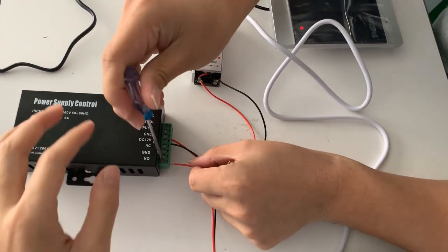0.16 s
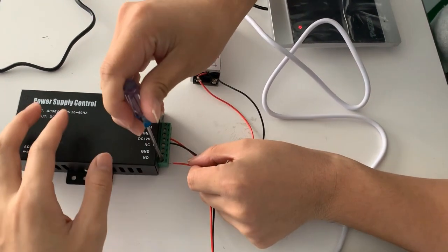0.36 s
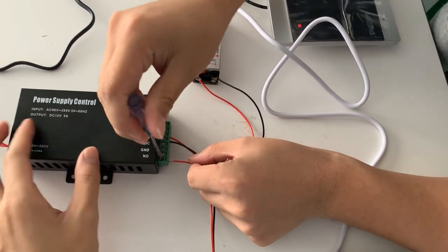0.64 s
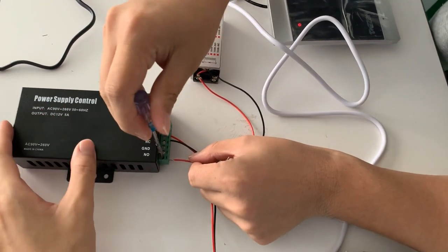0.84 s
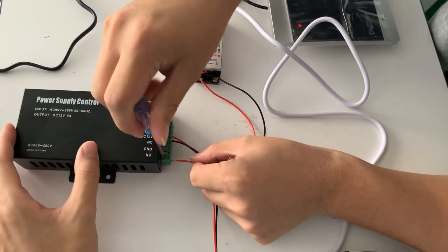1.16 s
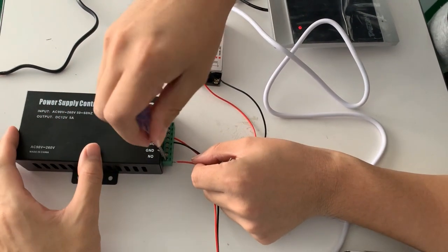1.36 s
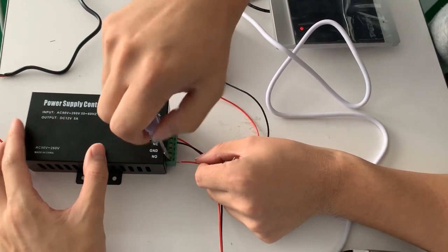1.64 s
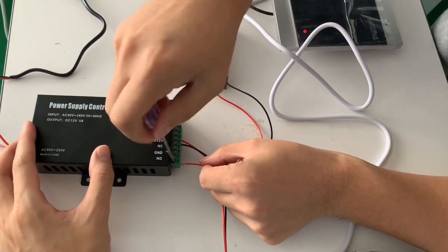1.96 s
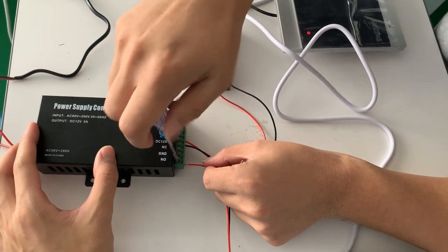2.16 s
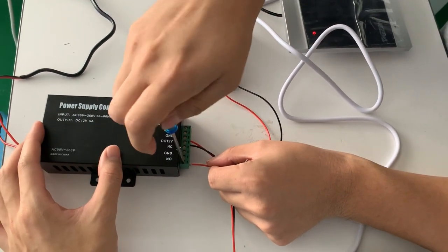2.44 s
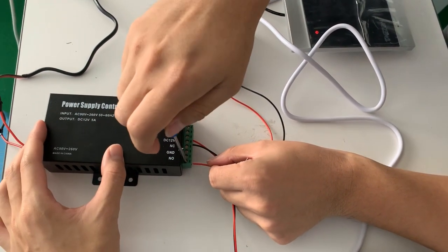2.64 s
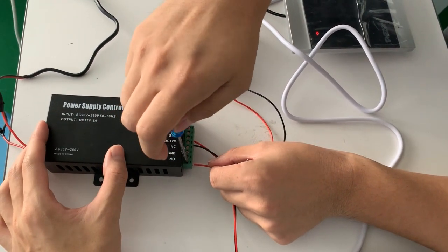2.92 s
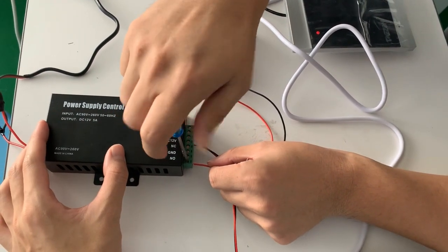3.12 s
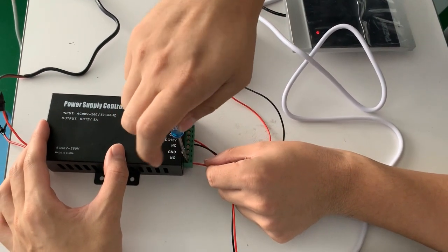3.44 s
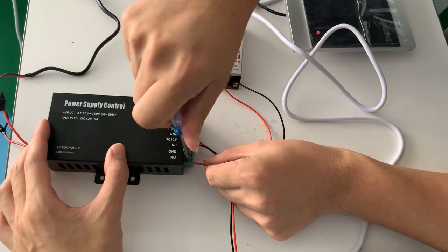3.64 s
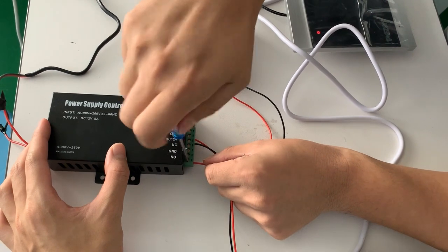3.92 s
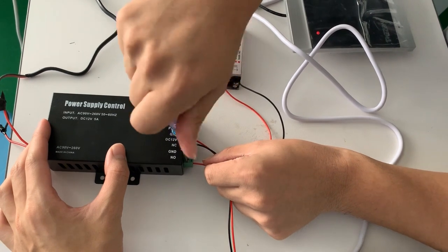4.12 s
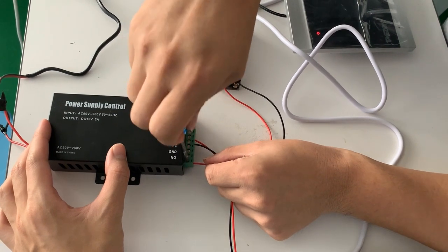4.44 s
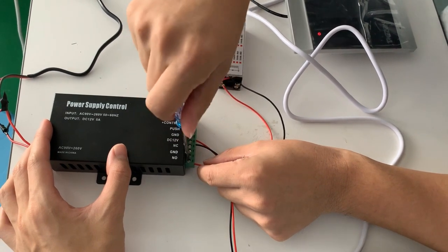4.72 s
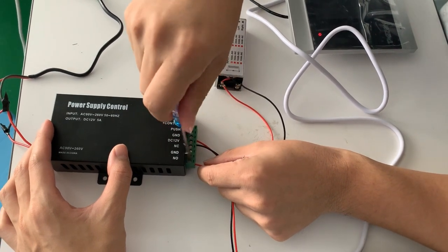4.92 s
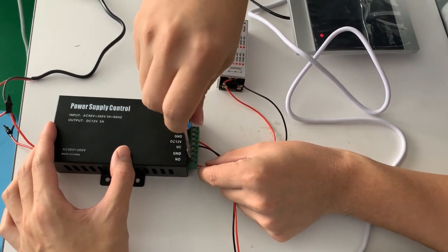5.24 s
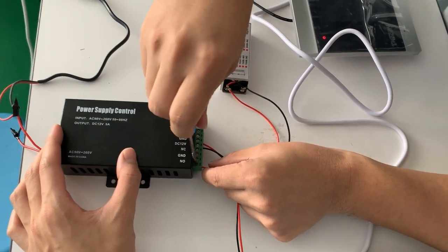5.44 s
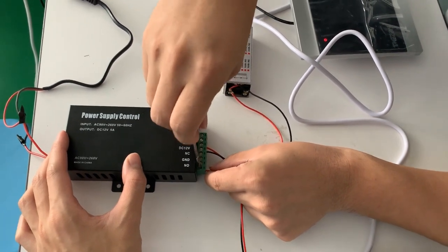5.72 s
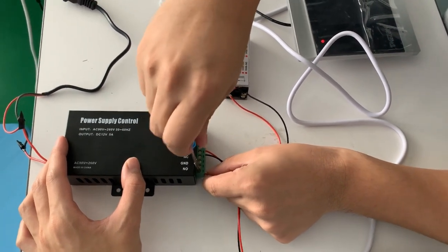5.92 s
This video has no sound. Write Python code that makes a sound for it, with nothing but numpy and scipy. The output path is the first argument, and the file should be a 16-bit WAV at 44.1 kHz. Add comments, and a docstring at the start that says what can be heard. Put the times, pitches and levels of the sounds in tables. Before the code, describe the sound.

Close, irregular clicks and light knocks of a small tool on a metal box, faint rustling, and a distant air puff over deep workroom hum.

```python
"""Throughout, machines hum in the air noise of a large workroom, and skin and wire rustle as grainy noise.
From the start a small screwdriver and wire ends tick on a plastic terminal block: short pushes ring steel modes.
The metal box under it knocks and the desk thuds, in lower modes; early on the blade squeals once, and it drags.
Far squeaks, thin wandering tones, follow, then one puff of an air valve, a shaped hiss; ticks go on to the end.
A phone with two ports above the desk hears bass in the middle and combs the treble between middle and sides."""
import sys
import numpy as np
from scipy import signal
from scipy.fft import rfft, irfft, next_fast_len
from scipy.io import wavfile
from scipy.ndimage import uniform_filter1d

SR = 44100
rng = np.random.default_rng(int(sys.argv[2]) if len(sys.argv) > 2 else 0)


def ratio(d):
    """dB to gain"""
    e = np.asarray(d, float) / 20
    return 10 ** e


def file_out(sig):
    """Save sig as 16-bit WAV at sys.argv[1]."""
    # one column per channel
    cols = np.atleast_2d(sig).T
    # limit, then scale
    lim = np.clip(cols, -1, 1)
    pcm = np.round(lim * 32767).astype(np.int16)
    wavfile.write(sys.argv[1], SR, pcm)


N = 267775
TIME = np.arange(N) / SR

# Modes of the metal box. Each row: frequency in Hz, relative level in dB, undamped time to fall 60 dB in seconds.
BOX_MODES = [(950, 1, 0.05), (1065, 3, 0.062), (1330, -10.5, 0.027), (1378, 2, 0.036), (1480, -1.5, 0.037),
             (1600, 4, 0.036), (1700, -3.5, 0.032)]
# Modes of the steel tool and plastic block. Each row: frequency in Hz, relative level in dB,
# undamped time to fall 60 dB in seconds.
TOOL_MODES = [(2575, 3, 0.045), (2994, -1.5, 0.048), (3790, -5, 0.061), (4200, 3, .018), (5550, -5, 0.051),
              (6140, 7.5, 0.015), (7430, -7, 0.032), (8240, -14.5, .028), (8500, -12, 0.026),
              (9070, -5, .014), (10110, -5, 0.017)]


def on_axis(table, hz):
    """Read a (Hz, value) table on a log-frequency axis."""
    f, v = np.transpose(table)
    return np.interp(np.log(hz + 1), np.log(f), v)


def shape(x, gain):
    """Filter by a gain that is a function of frequency."""
    size = next_fast_len(x.shape[-1] + 4096)
    hz = np.arange(size // 2 + 1) * SR / size
    return irfft(rfft(x, size) * gain(hz), size)[..., :x.shape[-1]]


def unit(x):
    """Scale to rms 1."""
    return x / np.sqrt(np.mean(x ** 2))


def band(hz, width, size=N):
    """Two unrelated noises around hz, rms 1."""
    noise = rng.standard_normal((2, size))
    return unit(shape(noise, lambda f: 1 / (1 + ((f - hz) / width * 2) ** 4)))


def walk(rate):
    """Slow random drift, smoothed from `rate` draws a second, rms 1."""
    hold = int(SR / rate)
    steps = np.repeat(rng.standard_normal(N // hold + 1), hold)
    return unit(uniform_filter1d(uniform_filter1d(steps, hold), hold)[:N])


def curve(table):
    """Interpolate the columns of a table over time."""
    s, *columns = np.transpose(table)
    return [np.interp(TIME, s, c) for c in columns]


def reverb(x, decays):
    """Diffuse tail: octave bands of noise, each dying at its own rate; mean energy 1 over the two rows."""
    t = np.arange(SR) / SR
    tail = 0
    for hz in 350 * 2. ** np.arange(6):
        fall = ratio(-60 * t / on_axis(decays, hz))
        tail = tail + band(hz, hz * 0.68, size=SR) * np.sqrt(hz) * fall
    # silent for 6 ms, then fades in over 16 ms
    tail = tail * np.clip((t - .006) / .016, 0, 1)
    tail = tail / np.sqrt(np.sum(tail ** 2) / 2)
    return signal.fftconvolve(x[None], tail, axes=1)[:, :N]


def ring(modes, hz, octaves, contact_ms, crack, rise=0.18, drop=0.96, free=0.99):
    """A rattling contact drives the modes near hz and is partly heard bare itself; peak 1."""
    t = np.arange(7168) / SR
    f, db, t60 = np.transpose(modes)[:, :, None]
    chance = rng.standard_normal((len(modes), 2))
    strength = ratio(db - 6 * (np.log2(f / hz) / octaves) ** 2 + 2.2 * chance[:, :1])
    # free is the share of the ring time that the hands leave
    decay = ratio(-60 * t / (free * t60))
    detune = 1 + 0.015 * chance[:, 1:]
    body = np.sum(strength * decay * np.sin(2 * np.pi * f * detune * t), axis=0)
    # a few hard micro-contacts stand out of many weak ones
    hardness = np.repeat(rng.standard_normal(len(t) // 8), 8)
    grit = rng.standard_normal(len(t)) * ratio(3.2 * hardness)
    # the push swells, then lets go
    u = t * 1000 / max(contact_ms, .1)
    push = grit * (1 - np.exp(-u / rise)) * np.exp(-u ** drop)
    ringing = unit(signal.fftconvolve(push, body)[:len(t)])
    # the bare contact falls off on both sides of hz
    bare = unit(shape(push, lambda g: ratio(-np.where(g < hz, 9., 9.5) * np.log2((g + 1) / hz) ** 2)))
    y = ringing + crack * bare
    return y / np.max(np.abs(y))


def add(out, s, y):
    """Place y at time s."""
    i = int(s * SR)
    out[i:i + len(y)] += y[:N - i]


def workroom():
    """Broad air noise, wavering hum bands, steady motor tones and mains hum that throbs with a slow shaft."""
    # Air noise. Each row: frequency in Hz, level in dB per Hz before it wavers.
    air_colour = [(15, -77), (25, -59), (40, -71.5), (80, -71), (160, -71), (250, -77), (400, -86.5),
                  (630, -89.5), (1000, -102), (1600, -106), (2500, -116), (8000, -125), (16000, -131)]
    # Machine hum. Each row: centre in Hz, width in Hz, level in dB before it wavers.
    hum_bands = [(45.22, 10, -50), (65.84, 7.9, -53), (91.03, 7.7, -52.5), (141.5, 9.6, -62.5),
                 (197.8, 14, -51.5), (214, 7.3, -59), (282, 15, -65.5), (465, 22, -72), (607.5, 18, -70),
                 (787.6, 12, -78)]
    # Motor tones. Each row: frequency in Hz, rms level in dB.
    motor_tones = [(31.29, -54), (115.94, -61), (199.5, -55)]
    mains_hz, mains_rms_db = 99.76, -46.5
    throb_hz, throb_s, throb_depth, sway_rad = 5.395, .1128, 0.29, 0.77

    white = rng.standard_normal((2, N))
    air = shape(white, lambda f: ratio(on_axis(air_colour, f)) * np.sqrt(SR / 2))
    air = air * ratio(1.3 * walk(7) + 2.06 * walk(30))
    hum = sum(ratio(db + 2.3 * walk(8.3)) * band(hz, width) for hz, width, db in hum_bands)
    tones = sum(ratio(db) * np.sin(2 * np.pi * (hz * TIME + rng.random())) for hz, db in motor_tones)
    # each turn of the shaft swells the level and sways the phase
    shaft = 2 * np.pi * throb_hz * (TIME - throb_s)
    swell = 1 + throb_depth * np.cos(shaft)
    sway = sway_rad * np.cos(shaft + 0.43)
    mains = ratio(mains_rms_db) * swell * np.cos(2 * np.pi * mains_hz * TIME - sway)
    return air + hum + np.sqrt(2) * (tones + mains)


def squeaks():
    """Thin far tones of quickly wandering pitch; middle and sides hear them by different paths and beat."""
    # Each row: start in seconds, end in seconds, pitch in Hz, width of the wander in Hz,
    # first level in dB, last level in dB.
    squeak_rows = [(1.17, 1.39, 4760, 220, -76, -71.5), (1.4, 1.62, 4760, 220, -78, -83),
                   (1.43, 1.52, 3040, 190, -79, -77), (2.906, 3.095, 4445, 75, -68, -67.5),
                   (3.125, 3.152, 4450, 70, -73, -75), (3.17, 3.22, 4400, 90, -78, -79),
                   (3.243, 3.262, 4410, 60, -74, -70)]
    out = 0
    for start, end, hz, width, first_db, last_db in squeak_rows:
        # 12 ms fades outside start and end
        gate = np.clip(np.minimum(TIME - start, end - TIME) / .012 + 1, 0, 1)
        db = np.interp(TIME, [start, end], [first_db, last_db])
        paths = []
        for k in range(2):
            # the sides lie 26 Hz higher
            pitch = hz + 26 * k + width / 3 * walk(350)
            phase = 2 * np.pi * np.cumsum(pitch) / SR
            paths.append(ratio(walk(60)) * np.sin(phase))
        out = out + gate * ratio(db) * np.array(paths)
    return out


def valve():
    """A far puff of compressed air: the flow rises, holds and dies; smooth hiss with the tail of the hall."""
    # Colour of the hiss. Each row: frequency in Hz, relative level in dB per Hz.
    hiss_colour = [(800, -7.5), (2000, -12.5), (3500, -8.5), (7000, -10), (12000, -14), (16000, -19.5)]
    # Decay of the hall. Each row: frequency in Hz, time to fall 60 dB in seconds.
    hall_decay = [(1500, 1), (4000, 0.92), (15000, 0.23)]
    start_s, rise_s, hold_s = 3.229, 0.098, 0.12
    hiss_db, fall_db_per_s, hall_db = -63.5, 120, 3

    t = TIME - start_s
    closing = np.maximum(t - rise_s - hold_s, 0)
    flow = np.clip(t / rise_s, 0, 1) ** 0.61 * ratio(hiss_db - fall_db_per_s * closing)
    hiss = unit(shape(rng.standard_normal((2, N)), lambda f: ratio(on_axis(hiss_colour, f)))) * flow
    return hiss + ratio(hall_db) * reverb(hiss[0], hall_decay)


def rustle():
    """Skin and wire slide over a steady bed: grainy bands, and resonances that come and go with the contact."""
    # The sliding. Each row: time in seconds, base level in dB at 3600 Hz, tilt in dB per octave.
    sliding = [(0, -55.5, -2.5), (0.07, -60, -2.5), (0.14, -56, 0.5), (0.25, -61.5, 0.5), (0.45, -70, -3),
               (0.62, -72, 5), (1.1, -71.5, -6.5), (1.45, -84, 3), (1.6, -76.5, -11), (2.45, -82.5, -15),
               (2.65, -67.5, -7.5), (2.8, -91, -15.5), (3.05, -73.5, -4.5), (3.5, -67.5, -3),
               (3.95, -97, 0), (4.15, -71.5, -8), (4.35, -87, 4), (4.46, -67.5, -7), (4.6, -65.5, -10),
               (4.79, -71.5, -9.5), (4.9, -94.5, -21), (5.1, -87, -16), (5.36, -59.5, -0.5),
               (5.62, -81.5, 3.5), (5.78, -71.5, -7), (6.07, -82, -8)]
    # Noise bands. Each row: centre in Hz, width in Hz, share of the sliding in dB,
    # steady bed in dB before the resonances colour it.
    slide_bands = [(1400, 1640, -3.5, -72), (3500, 9700, -8.5, -99), (3350, 3600, -1, -96.5),
                   (9280, 8200, -10.5, -85)]
    # Resonances that sliding excites. Each row: frequency in Hz, relative level in dB.
    rub_modes = [(3250, -0.5), (3900, -6.5), (7000, -1.5), (7600, -3), (8400, -3.5)]

    level_db, tilt = curve(sliding)
    level = lambda hz: level_db + tilt * np.log2(hz / 3600)
    grain = 2.4 * walk(400)
    noise = 0
    for hz, width, share_db, bed_db in slide_bands:
        slide = ratio(level(hz) + share_db + grain + 2.5 * walk(70))
        noise = noise + np.hypot(slide, ratio(bed_db)) * band(hz, width)
    # box and tool colour the noise with narrow peaks
    peaks = lambda f: sum(0.48 / (1 + ((f - hz) / (0.015 * hz)) ** 2) for hz, _, _ in BOX_MODES + TOOL_MODES)
    noise = shape(noise, lambda f: 0.53 + peaks(f))
    for hz, db in rub_modes:
        contact = ratio(level(hz) - 15.5 + db + grain + 2.7 * walk(25))
        noise = noise + contact * band(hz, 0.05 * hz)
    return noise


def thuds():
    """The desk thuds under a firm push: low, short modes."""
    # Each row: start in seconds, peak level in dB, centre in Hz.
    pushes = [(0.376, -37.5, 490), (0.545, -42.5, 463), (0.776, -34.5, 485), (0.939, -37, 680),
              (3.567, -47, 430), (4.498, -45, 609), (4.676, -45, 633)]
    # Modes of the desk. Each row: frequency in Hz, relative level in dB,
    # undamped time to fall 60 dB in seconds.
    desk_modes = [(358, 1.5, 0.098), (508, -1.5, 0.061), (515, -3.5, 0.029), (653, -0.5, 0.074)]
    out = np.zeros(N)
    for s, db, hz in pushes:
        y = ring(desk_modes, hz, octaves=0.34, contact_ms=7.8, crack=0.23, drop=1., free=0.81)
        add(out, s, ratio(db) * y)
    return out


def knocks():
    """The box knocks; weak blows leave it in the hand's grip, so they ring shorter."""
    # Each row: start in seconds, peak level in dB, centre in Hz.
    blows = [(0.125, -36, 1480), (0.13, -41, 1130), (0.367, -47.5, 1560), (0.4756, -52, 1350),
             (0.621, -42, 1310), (0.9324, -31.5, 1480), (1.1839, -42.5, 1400), (1.5616, -54.5, 1540),
             (1.6818, -47, 1370), (1.7084, -50, 1365), (1.932, -49, 1400), (2.288, -42.5, 940),
             (2.293, -38, 1570), (2.577, -46, 1550), (3.327, -47.5, 1390), (3.8894, -48, 1400),
             (4.021, -46.5, 1310), (4.096, -55.5, 1400), (4.2572, -48, 1400), (4.4938, -33.5, 1400),
             (4.543, -44, 1330), (4.672, -41, 1543), (4.806, -40.5, 1255), (4.9672, -51.5, 1700),
             (5.0593, -49.5, 1400), (5.1767, -34, 1740), (5.18, -38.5, 1100), (5.299, -39.5, 1120),
             (5.3077, -37.5, 1700), (5.3822, -44, 1740), (5.4335, -41, 1530), (5.463, -46, 1520)]
    free_db, damp_db_per_db = -40, 0.27
    out = np.zeros(N)
    for s, db, hz in blows:
        free = np.clip(ratio(damp_db_per_db * (db - free_db)), .4, 1)
        y = ring(BOX_MODES, hz, octaves=0.14, contact_ms=4.9, crack=0.16, rise=0.6, drop=.9, free=free)
        add(out, s, ratio(db) * y)
    return out


def squeals():
    """The blade squeals stick-slip in the slot: uneven multiples of the slip rate catch at once and fade."""
    # Each row: start in seconds, level in dB, slip rate in Hz, time to fade by 12 dB in seconds.
    slips = [(0.684, -49, 1594, 0.05)]
    # Mean level in dB of each multiple of the slip rate.
    multiples_db = [3, -12.5, -19, -25]
    out = np.zeros(N)
    for s, db, hz, length in slips:
        u = np.maximum(TIME - s, 0)
        grip = (1 - np.exp(-u / 0.0028)) * ratio(-12 * (u / length) ** 3.5)
        phase = 2 * np.pi * np.cumsum(hz * (1 + .012 * walk(500))) / SR
        stack = sum(ratio(m + 3.5 * walk(120)) * np.sin((k + 1) * phase) for k, m in enumerate(multiples_db))
        out += ratio(db) * grip * stack
    return out


def scrapes():
    """The tip drags across the slot: a long rattling contact stirs all the tool's modes."""
    # Each row: start in seconds, peak level in dB, centre in Hz, contact in ms.
    drags = [(0.687, -46, 8060, 42), (0.946, -48.5, 7960, 131), (1.68, -49, 7500, 35),
             (2.282, -50.5, 6260, 32), (4.476, -54, 8450, 72)]
    out = np.zeros(N)
    for s, db, hz, contact_ms in drags:
        y = ring(TOOL_MODES, hz, octaves=5.0, contact_ms=contact_ms, crack=1.4, rise=0.094, drop=12.0)
        add(out, s, ratio(db) * y)
    return out


def ticks():
    """The tip ticks in steel and plastic: a short contact rings few modes, with more bare crack when high."""
    # Each row: start in seconds, peak level in dB, centre in Hz.
    touches = [(0.1054, -55.5, 3800), (0.125, -25.5, 8350), (0.1282, -36.5, 3790), (0.367, -39.5, 8500),
               (0.9323, -36.5, 6900), (0.9346, -19.5, 9480), (1.1826, -59, 4400), (1.6906, -51.5, 6900),
               (1.718, -44.5, 11500), (2.3, -50.5, 10000), (2.5656, -42, 10000), (2.5755, -47, 4200),
               (2.576, -48.5, 7840), (4.492, -46.5, 9100), (4.524, -53.5, 9000), (4.4957, -62, 2770),
               (4.671, -43.5, 7650), (5.1772, -45, 7740), (5.178, -48, 3950), (5.2974, -35.5, 8020),
               (5.299, -42, 3930), (5.307, -41, 5550), (5.383, -56, 3800), (5.43, -38.5, 10300)]
    out = np.zeros(N)
    for s, db, hz in touches:
        crack = 0.39 + (hz / 9500) ** 3
        y = ring(TOOL_MODES, hz, octaves=0.09, contact_ms=3.86, crack=crack, rise=0.36, drop=0.88)
        add(out, s, ratio(db) * y)
    return out


def scene():
    """Row 0 feeds the middle, row 1 the sides; near sound reaches the sides a quarter turn late."""
    # The desk lies off the phone's axis. Each row: frequency in Hz, extra side level in dB.
    near_side = [(500, -4.5), (1200, -9.5), (2500, 6.5), (8000, -4.5), (14000, 6.5)]
    # Decay of near sound in the room. Each row: frequency in Hz, time to fall 60 dB in seconds.
    room_decay = [(500, 0.3), (2000, 0.24), (6000, 0.15), (15000, 0.067)]
    room_db = -20

    near = thuds() + knocks() + squeals() + scrapes() + ticks()
    late = shape(near, lambda f: -1j * ratio(on_axis(near_side, f)))
    direct = np.array([near, late])
    room = ratio(room_db) * reverb(near, room_decay)
    return workroom() + squeaks() + valve() + rustle() + room + direct


def roll_off(x):
    """The treble ends steeply here."""
    return signal.sosfilt(signal.butter(12, 16680, fs=SR, output="sos"), x)


def record(dry):
    """The phone's ports share the power of each frequency between middle and sides."""
    # Each row: frequency in Hz, side minus middle level in dB.
    port_balance = [(25, -29), (125, -38.5), (250, -9.5), (500, 0.5), (1000, 3), (1800, 6), (2120, 9.5),
                    (2600, 2), (3700, -1), (5000, 5.5), (7000, -1), (8500, -3.5), (10000, -3), (12000, 9),
                    (13500, -2), (15000, -1)]
    # steep treble limit
    dry = shape(dry, lambda f: 1 / (1 + (f / 16300) ** 80))
    mid = shape(dry[0], lambda f: 1 / np.sqrt(1 + ratio(2 * on_axis(port_balance, f))))
    side = shape(dry[1], lambda f: 1 / np.sqrt(1 + ratio(-2 * on_axis(port_balance, f))))
    # the left port hears the low middle a little louder
    lean = shape(mid, lambda f: 0.078 / (1 + (np.log2((f + 1) / 250) / 0.99) ** 4))
    return roll_off(np.array([mid + side + lean, mid - side - lean]))


dry = scene()
out = record(dry)
file_out(out)
```